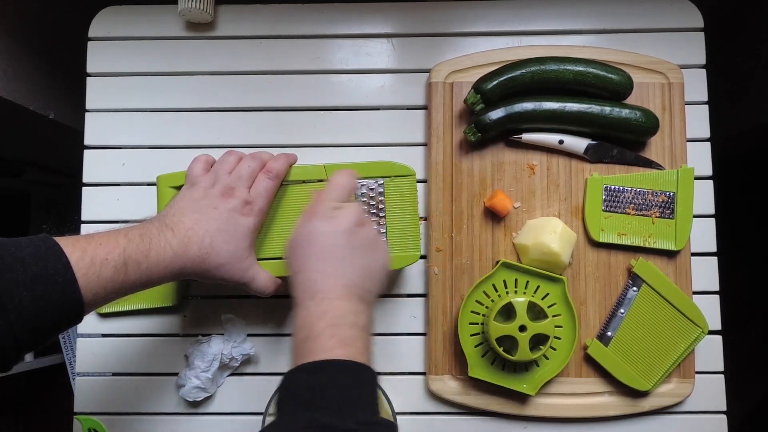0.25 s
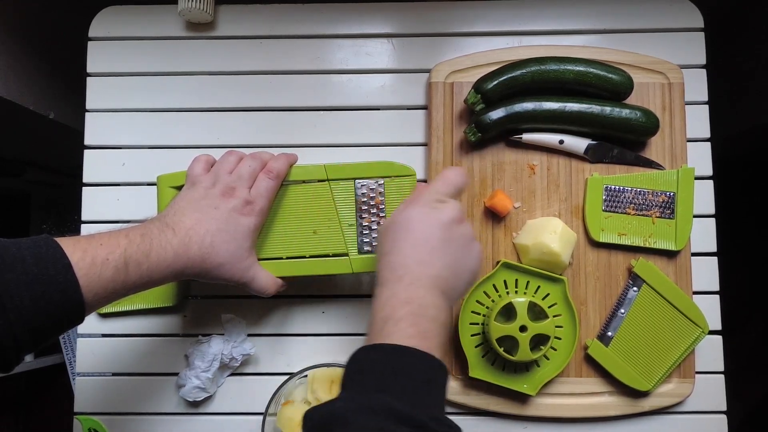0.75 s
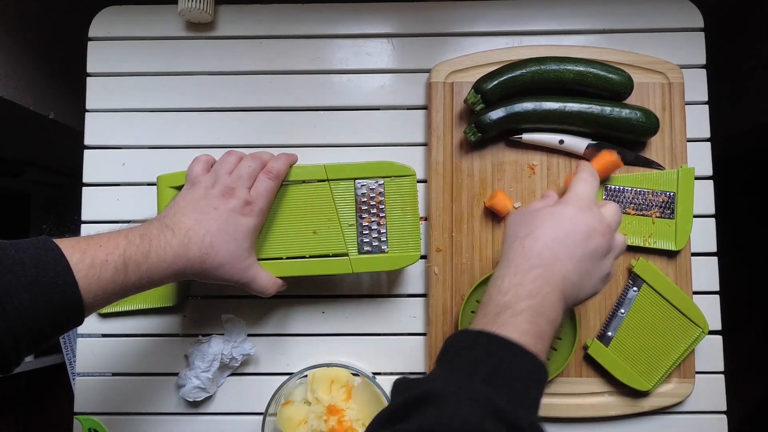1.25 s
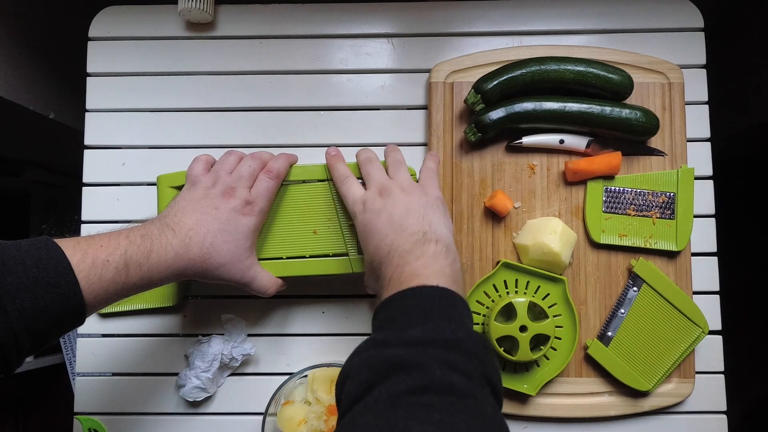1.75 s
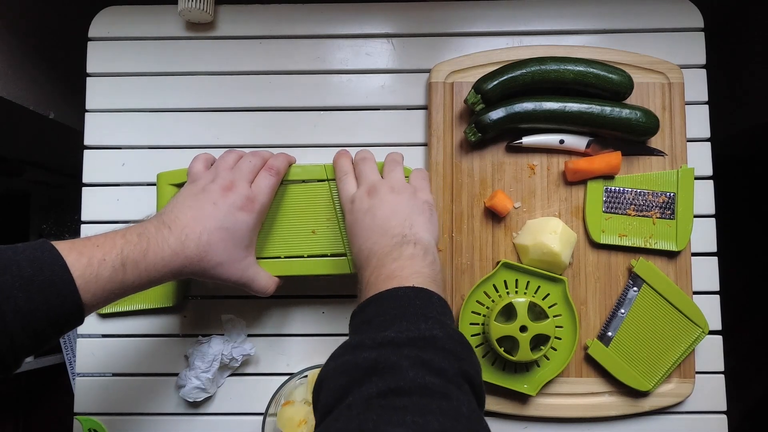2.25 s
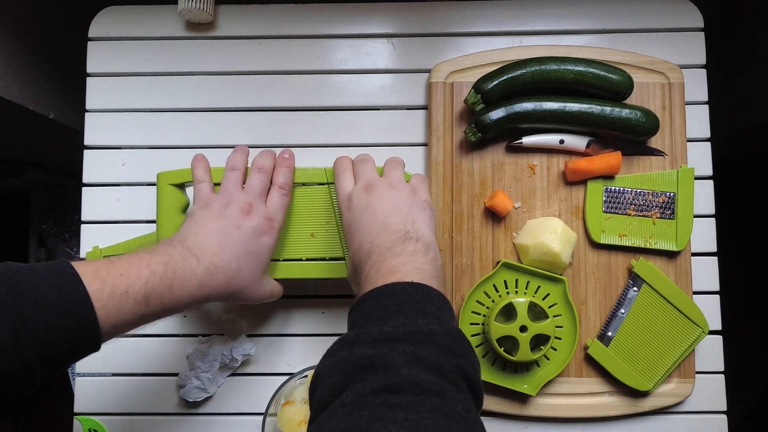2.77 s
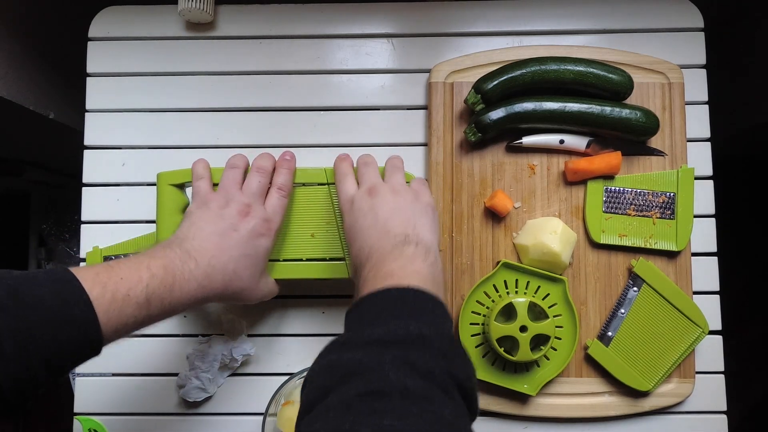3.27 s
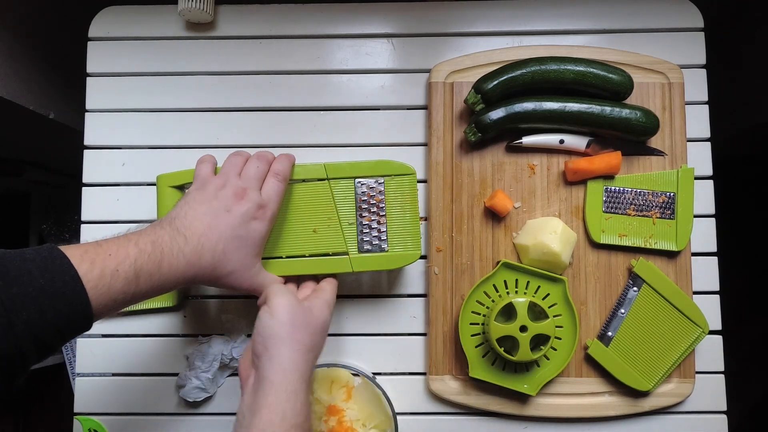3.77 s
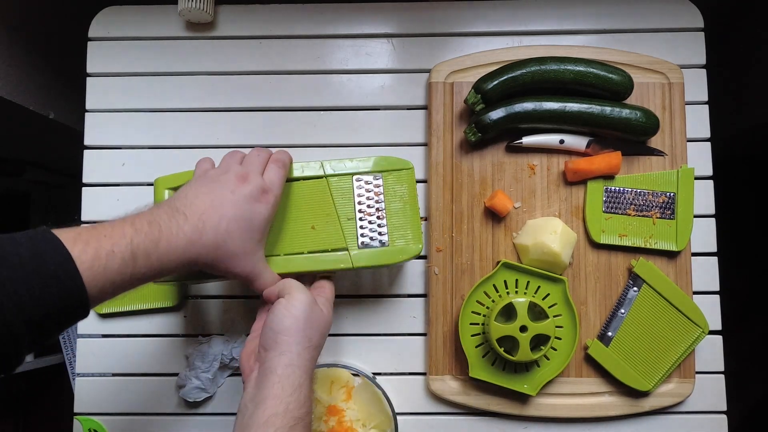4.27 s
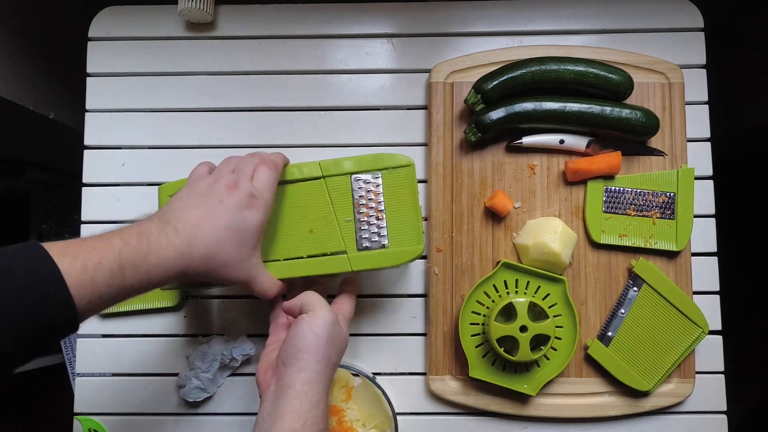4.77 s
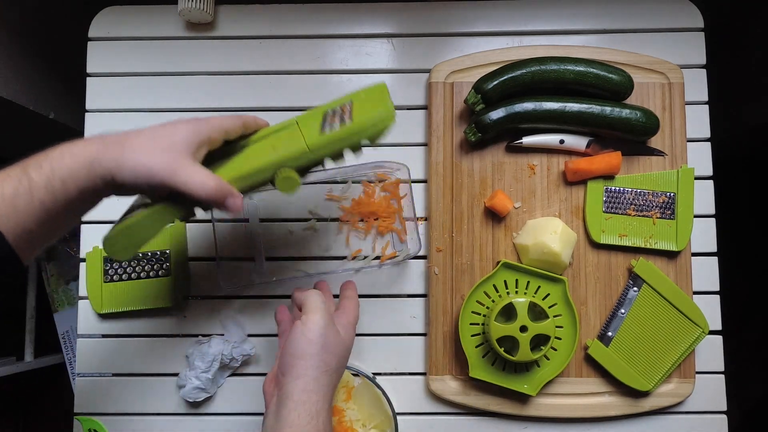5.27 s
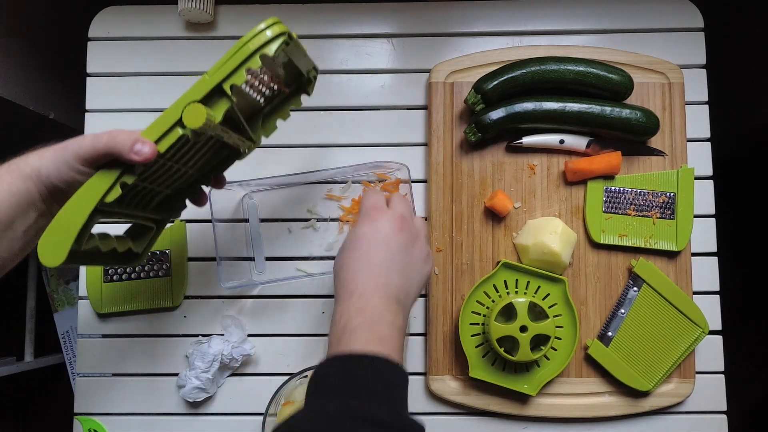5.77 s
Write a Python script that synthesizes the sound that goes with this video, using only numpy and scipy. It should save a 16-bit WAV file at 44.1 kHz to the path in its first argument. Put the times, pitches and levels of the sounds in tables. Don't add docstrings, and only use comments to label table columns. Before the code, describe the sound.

A small hard-surfaced kitchen, heard close in stereo with short bright reverberation, low hum, faint hiss and a very thin high whine. From 0 to 0.7 s a carrot works over a hollow plastic slicer: the tail of a stroke, boxy knocks near 0.2 s with a short rasp, then harder knocks at 0.53 and 0.6 s with another rasp. At 1.2 s the carrot drops against a plastic insert, judders in quick dying bounces and rolls until about 1.65 s. Soft taps follow, a loud hollow clunk at 2.3 s, palm slides, then soft thuds around 3.25 to 3.4 s. At 3.72 s rubber feet give a brief falling groan, ending in hard latch clacks near 3.9 s. A sharp shift and drag comes at 4.4 s, a softer click at 4.7 s. At 5.08 s the slicer pops free with rapid clattering bounces and a ringing tray; then near quiet.

```python
import sys
import numpy as np
from scipy import signal
from scipy.fft import rfft, irfft, next_fast_len
from scipy.io import wavfile

SR = 44100
rng = np.random.default_rng(int(sys.argv[2]) if len(sys.argv) > 2 else 0)


def volts_from_db(level):
    exponent = np.asarray(level, float) / 20
    return 10 ** exponent


def dump(signal):
    limited = np.clip(np.atleast_2d(signal).T, -1, 1)
    pcm = np.round(limited * 32767).astype(np.int16)
    wavfile.write(sys.argv[1], SR, pcm)


N = 265583


def rms_one(x):
    return x / np.sqrt(np.mean(x ** 2) + 1e-20)


def at_hz(points, hz):
    table_hz, value = np.array(points).T
    return np.interp(np.log(np.maximum(hz, 1)), np.log(table_hz), value)


def colour(x, points):
    length = x.shape[-1]
    size = next_fast_len(length)
    gain = volts_from_db(at_hz(points, np.fft.rfftfreq(size, 1 / SR)))
    return irfft(rfft(x, size) * gain, size)[..., :length]


def band(x, low_hz, high_hz):
    return signal.sosfilt(signal.butter(2, [low_hz, high_hz], "band", fs=SR, output="sos"), x)


def sharing(table, *shared):
    return [row + shared for row in table]


def snapping(table, snap_re_crack_db):
    return [row + (row[-1] + snap_re_crack_db,) for row in table]


def strike(modes, t, spot_hz, reach_db, damping, rise_s):
    hz, db, t60 = np.array(modes).T[:, :, None]
    off_spot_db = reach_db * np.abs(np.log2(hz / spot_hz))
    gain = volts_from_db(db - off_spot_db + 2 * rng.standard_normal((len(modes), 1)))
    decay = volts_from_db(-60 * t / (t60 * damping))
    wave = (gain * decay * np.sin(2 * np.pi * hz * t)).sum(0)
    wave = wave * (1 - np.exp(-t / rise_s))
    return wave / np.abs(wave).max()


def knocks(table, body, plate, damping, thump, reach_db, crack_t60, snap_t60):
    out, t = np.zeros(N + SR), np.arange(int(.45 * SR)) / SR
    thump_db, thump_t60 = thump
    for s, peak_db, spot_hz, top_db, crack_db, snap_db in table:
        noise = rng.standard_normal((2, len(t)))
        crack = band(noise[0], 690, 3310) * volts_from_db(-60 * t / crack_t60)
        snap = band(noise[1], 3900, 11500) * volts_from_db(-60 * t / snap_t60)
        blow = volts_from_db(thump_db) * strike([(spot_hz, 0, thump_t60)], t, spot_hz, 0, 0.83, thump_t60 / 15)
        blow += volts_from_db(-3.5) * strike(body, t, spot_hz, reach_db, damping[0], 0.0025)
        blow += volts_from_db(top_db + 6) * strike(plate, t, 1200, 0, damping[1], 0.0018)
        blow += volts_from_db(crack_db + 6.0) * crack
        blow += volts_from_db(snap_db - 1.5) * snap
        start = round(s * SR)
        out[start:start + len(t)] += volts_from_db(peak_db) * blow
    return out[:N]


def slips(per_s, spread_db):
    sizes = volts_from_db(spread_db * np.minimum(rng.exponential(1, N), 4)) * rng.choice([-1, 1], N)
    return rms_one(sizes * (rng.random(N) < per_s / SR))


def ring(force, modes, damping):
    out, power = 0, 0
    for k, (hz, db, t60) in enumerate(modes):
        r, w = volts_from_db(-60 / (t60 * damping * SR)), 2 * np.pi * hz / SR
        mode = signal.lfilter([volts_from_db(db) * np.sin(w)], [1, -2 * r * np.cos(w), r * r], force + 1e-18)
        out = out + (-1) ** k * mode
        power += volts_from_db(2 * db) / (2 - 2 * r * r)
    return out / np.sqrt(power)


def rubbing(rasps, plate, damping, body=0, top=0):
    body, top, hiss = body + np.zeros(N), top + np.zeros(N), np.zeros(N)
    clumps = volts_from_db(1.7 * rms_one(band(rng.standard_normal(N), 40, 360)))
    white = rng.standard_normal(N) * clumps
    for start, end, body_db, top_db, hiss_db, tilt_db in rasps:
        span = slice(max(int(start * SR), 0), int(end * SR))
        progress = np.linspace(max(-start, 0) / (end - start), 1, span.stop - span.start)
        arch = np.sin(np.pi * progress ** 0.7) ** 0.72
        body[span] += volts_from_db(body_db) * arch
        top[span] += volts_from_db(top_db) * arch
        tilt = [(900, -12.0), (1500, 8), (15000, tilt_db * np.log2(10)), (17000, -36.0)]
        hiss[span] += volts_from_db(hiss_db) * arch * rms_one(colour(white[span], tilt))
    box = ring(body * slips(per_s=500, spread_db=4.0), BODY, 0.25)
    return box + ring(top * slips(per_s=860, spread_db=3.0), plate, damping) + hiss


# frequency in Hz, level in dB, t60 in seconds.
BODY = [(122.2, -15.5, 0.39), (181.3, -16, 0.74), (265, -9, 0.076), (301, -0.5, 0.3), (359.5, -2.5, 0.26),
        (385, 3, 0.19), (430.7, -1.5, 0.15), (456, -1, 0.2), (530.8, -4.5, 0.21), (561, -9.5, 0.49),
        (633, -10.5, 0.11)]
# frequency in Hz, level in dB, t60 in seconds.
TOP_PLATE = [(742, -6.5, 0.1), (846, -9.5, 0.21), (935.3, -1.5, 0.19), (977, 0, 0.073), (1059, -12, 0.25),
             (1140, -7, 0.051), (1290, -14.5, 0.13), (1366, -29.5, 0.26), (1572, -17, .12),
             (1994, -18.5, 0.038)]
# start in seconds, peak in dB, struck-spot pitch in Hz, top plate in dB re peak.
CARROT_KNOCKS = [
    (0.181, -18.5, 386, -16.5),
    (0.198, -24.5, 337, -24),
    (0.247, -15.5, 398, -12.5),
    (0.533, -14, 398, -13.5),
    (0.605, -12, 399, -18),
    (0.639, -23.5, 512, -1.5),
]
# start in seconds, peak in dB, struck-spot pitch in Hz,
# top plate in dB re peak, crack in dB re peak.
FINGER_TAPS = [(1.88, -44.5, 388, -17, -20), (1.971, -42, 563, -14.5, -35), (1.988, -41, 343, -30, -40),
               (2.207, -49.5, 385, -24, -30), (2.269, -44, 377, -31, -30), (2.315, -28.5, 307, -13.5, -43),
               (2.527, -35.5, 457, -14, -23), (2.7, -54.5, 342, 3, -5.5), (2.778, -49.5, 301, -14, -15.5),
               (2.94, -51.5, 553, -24, -34), (3.212, -41, 454, -11, -22)]
FINGER_THUDS = [
    (3.247, -26, 411, -12, -23.5),
    (3.28, -27.5, 482, -14.5, -45),
    (3.425, -32, 457, -15, -29.5),
]
# start in seconds, peak in dB, pitch in Hz.
SLATS = [
    (.001, -29.5, 426),
    (2.001, -42.5, 126),
    (2.291, -25.5, 300),
    (2.429, -37, 135),
    (2.488, -60, 131),
    (3.741, -34, 315),
    (3.851, -22, 472),
    (3.89, -15.5, 307),
    (4.431, -17, 315),
]


def held_slicer():
    blows = sharing(CARROT_KNOCKS, -29, -22)
    blows += snapping(FINGER_TAPS, 4) + snapping(FINGER_THUDS, -18)
    blows += sharing(SLATS, -42, -31, -50.5)
    return knocks(blows, BODY, TOP_PLATE, damping=(.4, .5), thump=(-3, .05), reach_db=7.5,
                  crack_t60=0.22, snap_t60=0.044)


# tightest moment in seconds, body in dB, easing in dB per s,
# top plate in dB re body.
GRIPS = [(0.001, -45.5, 138, -7), (0.302, -37.5, 124.5, 0), (0.58, -38.5, 46.5, -8), (1.6, -50, 45, -10),
         (2.05, -61, 27.5, -18), (2.44, -45, 103, -4.5), (2.8, -50.5, 124, -12), (3.6, -57.5, 28, -18.5),
         (3.93, -42, 197, 6), (4.27, -44, 71, -12), (4.57, -55.5, 34, -19), (4.8, -50, 202, -16),
         (5.45, -56.5, 55, -6)]


def hands():
    s, body_db, easing_db_per_s, plate_db = np.transpose(GRIPS)[:, :, None]
    tighten_db_per_s, hop = 113, 64
    since = np.arange(0, N, hop) / SR - s
    slope = np.where(since < 0, tighten_db_per_s, -np.abs(easing_db_per_s))
    press = volts_from_db(body_db + slope * since)
    return [np.repeat(p.sum(0), hop)[:N] for p in (press, press * volts_from_db(plate_db))]


# start in seconds, end in seconds, body in dB, top plate in dB, hiss in dB.
RASPS = [
    (-.05, .04, -32.5, -34.5, -50),
    (0.253, 0.323, -19, -28.5, -37),
    (0.607, 0.694, -21.5, -29, -38.5),
]
SLIDES = [
    (2.41, 2.55, -38, -59, -63.5),
    (2.587, 2.728, -47, -52, -68),
    (3.14, 3.3, -49, -58.5, -78),
    (3.72, 3.86, -64, -49.5, -85),
]


def rasps_and_slides():
    strokes = sharing(RASPS, -0.6) + sharing(SLIDES, -2.5)
    return rubbing(strokes, TOP_PLATE, 0.22, *hands())


# frequency in Hz, level in dB, t60 in seconds.
INSERT = [(694, 1.5, 0.075), (969, -5.5, 0.4), (1037, -4.5, 0.28), (1234, -5.5, 0.1), (1465, -5, 0.055),
          (1740, -8.5, 0.085), (2050, -10.5, 0.041)]
DROP = [
    (1.181, -25, 260, -17, -16),
    (1.217, -16, 385, -30, -16.5),
]
# start in seconds, peak in dB, struck-spot pitch in Hz.
JUDDER = [
    (1.24, -20.5, 385),
    (1.265, -21.5, 350),
    (1.279, -31, 344),
    (1.291, -20, 486),
    (1.329, -26, 458),
    (1.369, -23.5, 320),
    (1.384, -31, 200),
    (1.404, -43, 366),
    (1.467, -33, 301),
    (1.548, -42.5, 302),
]


def dropped_carrot():
    fall = snapping(DROP, -1) + sharing(JUDDER, -7.5, -25, -43)
    return knocks(fall, BODY, INSERT, damping=(.3, .4), thump=(-4, .018), reach_db=12,
                  crack_t60=0.055, snap_t60=0.034)


ROLL = [
    (1.183, 1.31, -32, -37, -43.5),
    (1.215, 1.33, -27, -48, -88),
    (1.27, 1.46, -30, -38.5, -83),
    (1.44, 1.65, -48, -54.5, -89),
]


def rolling_carrot():
    return rubbing(sharing(ROLL, -2.5), INSERT, 0.14)


# frequency in Hz, level in dB, t60 in seconds.
FRAME = [(661.7, -1, 0.19), (716.6, -3, 0.33), (803, 5.5, 0.15), (852.4, 0, 0.18), (916, 0.5, 0.16),
         (1078, -1, 0.32), (1169, -5.5, 0.16), (1320, 4.5, 0.047), (1460, -5.5, 0.13), (1610, -7, 0.09),
         (1980, -14.5, 0.09), (2259, -18, 0.23), (2680, -11.5, 0.045)]
SHIFTS = [(2.288, -8.5, 475, -24.5, -26.5), (3.804, -38.5, 480, -13, -21), (3.884, -9, 319, -19, -46),
          (3.92, -19.5, 313, -5, -5), (4.233, -43.5, 288, -37, -28), (4.314, -21.5, 578, -7.5, -20.5),
          (4.411, -27.5, 416, -2.5, -15), (4.422, -9.5, 612, -9.5, -24), (4.643, -36, 288, -30, -32),
          (4.669, -41.5, 504, -5, -24), (4.76, -36.5, 412, -13.5, -37), (4.992, -48.5, 198, -24, -30)]
LATCH = [
    (3.876, -9, 530, -20, -20),
    (4.701, -23, 512, -13, -23),
]
RELEASE = [
    (5.078, -8.5, 385, -22, -24),
    (5.096, -11, 282, -24, -20),
    (5.119, -17.5, 355, -17.5, -29),
]


def loose_slicer():
    blows = snapping(SHIFTS, -13.5) + snapping(LATCH, 0.5) + snapping(RELEASE[1:], 1)
    return knocks(blows, BODY, FRAME, damping=(.55, .55), thump=(-7, .05), reach_db=18.5,
                  crack_t60=0.082, snap_t60=0.068)


# frequency in Hz, level in dB, t60 in seconds.
TRAY = [(181.9, -12.5, 0.57), (262.5, -6, 0.23), (307, -12.5, 0.47), (354.7, -1.5, 0.29),
        (364, -15.5, 0.61), (439, -6, 0.15), (626, -25, 0.366)]


def freed_tray():
    return knocks(snapping(RELEASE[:1], 1), TRAY, FRAME, damping=(1.05, .4), thump=(-4, .06), reach_db=7.5,
                  crack_t60=0.095, snap_t60=0.083)


DRAGS = [
    (3.82, 3.875, -51, -41.5, -58.5),
    (3.9, 3.96, -38, -25, -44),
    (4.31, 4.4, -38, -64, -63),
    (4.41, 4.5, -26.5, -27, -46.5),
    (4.65, 4.76, -43, -54, -63),
    (5.075, 5.13, -27, -28, -36),
]


def dragged_slicer():
    return rubbing(sharing(DRAGS, -4.5), FRAME, 0.16)


# time in seconds, slips per second, level in dB.
GROAN = [
    (3.718, 353, -46),
    (3.727, 325, -24.5),
    (3.744, 275, -23.5),
    (3.783, 190, -29.5),
    (3.797, 195.3, -47),
    (3.811, 185, -25.5),
    (3.845, 178, -30.5),
    (3.873, 178, -30.5),
    (3.88, 170, -53),
]


def groan():
    s, slips_hz, level_db = np.transpose(GROAN)
    t = np.arange(N) / SR
    wobble = rms_one(band(rng.standard_normal(N), 8.9, 80))
    rate_hz = np.interp(t, s, slips_hz) * (1 + 0.023 * wobble)
    phase = 2 * np.pi * np.cumsum(rate_hz) / SR
    partials = np.zeros(N)
    for k in (1, 2, 3):
        foot_db = -15 * np.abs(np.log2(k * rate_hz / 358))
        rubber_db = -117 * np.maximum(np.log2(k * rate_hz / 537), 0)
        partials += volts_from_db(foot_db + rubber_db) * np.sin(k * phase)
    return np.sqrt(2) * volts_from_db(np.interp(t, s, level_db, -200, -200)) * partials


# start in seconds, peak in dB, pitch in Hz, t60 in seconds.
TICKS = [
    (1.943, -58, 1110, 0.0029),
    (3.062, -60.5, 2330, 0.011),
    (4.124, -49, 965, 0.0045),
]


def ticks():
    out, t = np.zeros(N), np.arange(int(.03 * SR)) / SR
    for s, peak_db, hz, t60 in TICKS:
        for lag_s, bounce_db in (0, 12), (.004, 6.5), (.009, -34):
            at = round((s + lag_s) * SR)
            tick = strike([(hz, 0, t60)], t, hz, 0, 1, 1e-4)
            out[at:at + len(t)] += volts_from_db(peak_db + bounce_db) * tick
    return out


# frequency in Hz, t60 in seconds.
ROOM_T60 = [(100, 0.4), (400, 0.33), (1000, 0.38), (1700, 0.4), (4000, 0.38), (12000, 0.33)]
# frequency in Hz, side in dB re mid.
SIDE_DB = [(60, -28), (110, -35), (200, -46.5), (380, -29), (700, -17), (1290, -7.5), (2380, -1), (4400, 0),
           (8120, -0.5), (15000, 1.5)]


def kitchen(x, wet_db):
    t = np.arange(int(.7 * SR)) / SR
    white = rng.standard_normal((3, len(t)))
    edges_hz = 70 * 2 ** np.arange(0, 8.1, .5)
    tail = 0
    for low_hz, high_hz in zip(edges_hz, edges_hz[1:]):
        t60 = at_hz(ROOM_T60, np.sqrt(low_hz * high_hz))
        tail = tail + band(white[:2], low_hz, high_hz) * volts_from_db(-60 * t / t60)
    onset = 1 - np.exp(-t / 0.0031)
    tail = volts_from_db(wet_db) * tail * onset / np.sqrt((tail[0] ** 2).sum())
    near = white[2] * np.exp(-t / .018)
    near = near / np.sqrt((near ** 2).sum())
    mid = x + signal.fftconvolve(x, tail[0])[:N]
    side = colour(signal.fftconvolve(x, near + tail[1])[:N], SIDE_DB)
    return mid, side


# frequency in Hz, density in dB per Hz.
AIR = [(24, -49), (40, -23), (71, -21.5), (115, -4), (189, -0.5), (231, 4.5), (362, -1.5), (421, -2.5),
       (768, -11), (871, -9.5), (2490, -18), (14400, -20), (15900, -14)]
# frequency in Hz, side in dB re mid.
AIR_SIDE = [(60, -7.5), (240, -6.5), (950, -4), (3770, 1), (15000, 0.5)]
# frequency in Hz, rms in dB.
WHINE = [(15719, -77)]


def air():
    mid, side = colour(rng.standard_normal((2, N)), AIR)
    gain = volts_from_db(-61) / np.sqrt(np.mean(mid ** 2))
    t = np.arange(N) / SR
    whine = sum(np.sqrt(2) * volts_from_db(db) * np.sin(2 * np.pi * hz * t) for hz, db in WHINE)
    return gain * mid + whine, gain * colour(side, AIR_SIDE)


def scene():
    close = held_slicer() + rasps_and_slides() + dropped_carrot() + rolling_carrot()
    close += loose_slicer() + freed_tray() + dragged_slicer() + groan() + ticks()
    close = band(band(close, 126, 19000), 77, 21000)
    mid, side = np.add(kitchen(close, wet_db=-4.5), air())
    return np.array([volts_from_db(-2.65) * (mid + side), volts_from_db(-2.39) * (mid - side)])


def band_limit(x):
    return signal.sosfilt(signal.butter(12, 16280, fs=SR, output="sos"), x)


def record(dry):
    rounded = 0.59 * np.tanh(dry / 0.59)
    top_cut = signal.ellip(10, .3, 60, 15900, fs=SR, output="sos")
    return band_limit(signal.sosfilt(top_cut, rounded))


dry = scene()
out = record(dry)
dump(out)
```